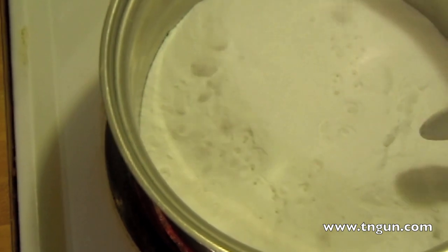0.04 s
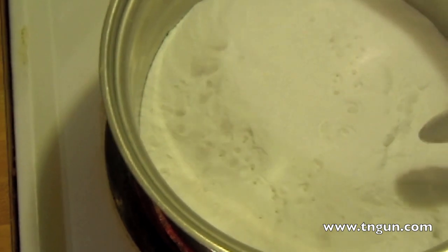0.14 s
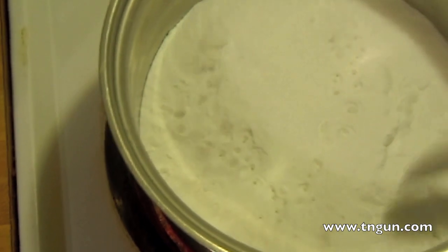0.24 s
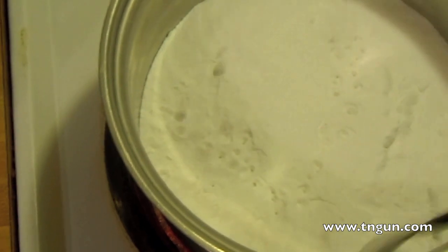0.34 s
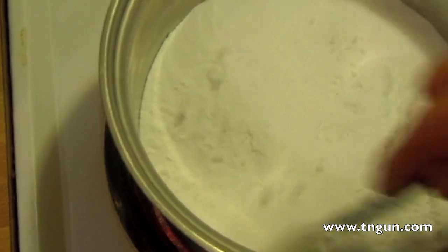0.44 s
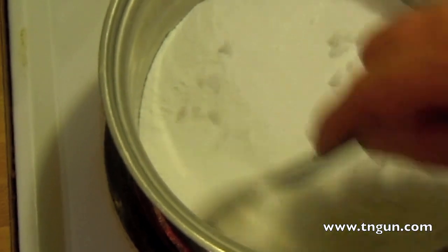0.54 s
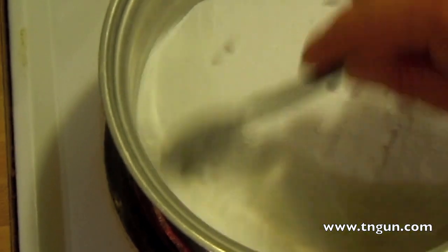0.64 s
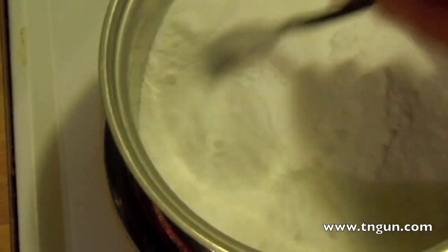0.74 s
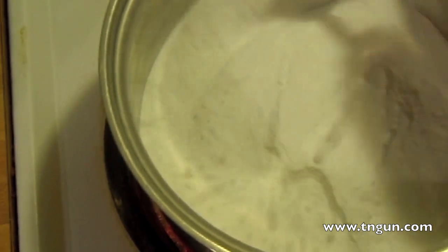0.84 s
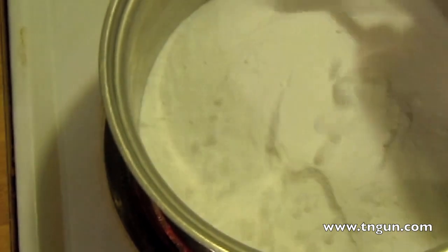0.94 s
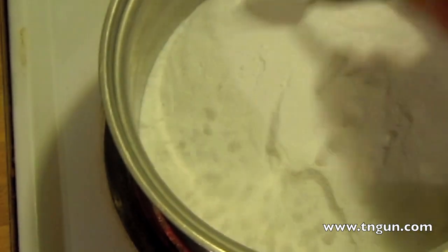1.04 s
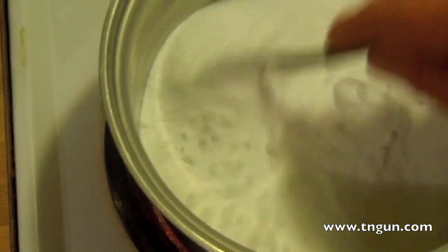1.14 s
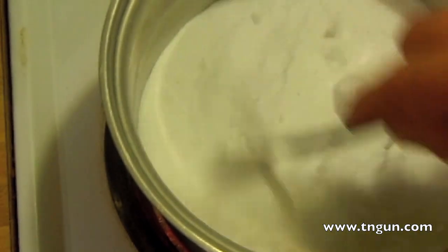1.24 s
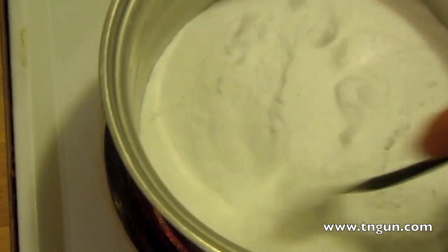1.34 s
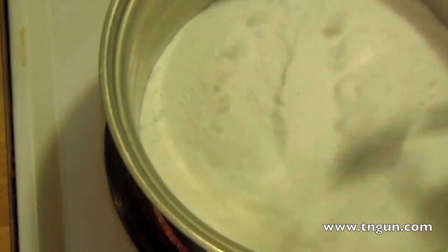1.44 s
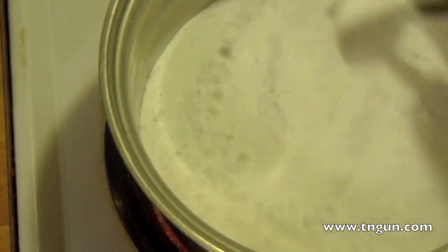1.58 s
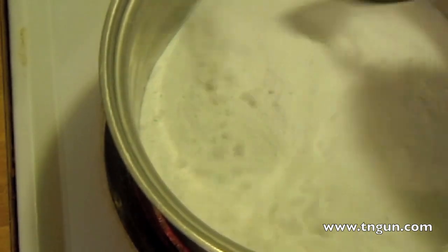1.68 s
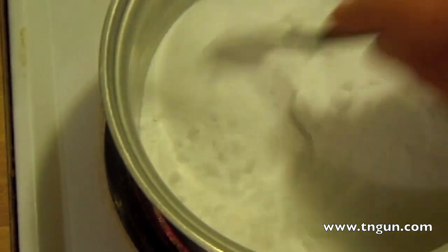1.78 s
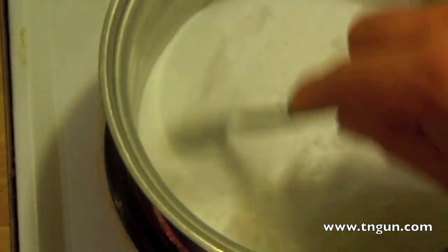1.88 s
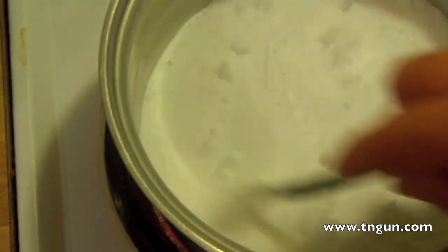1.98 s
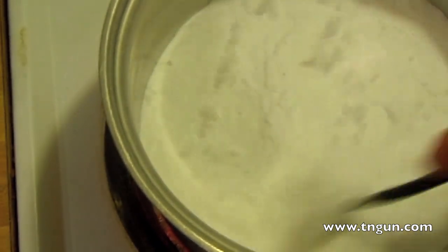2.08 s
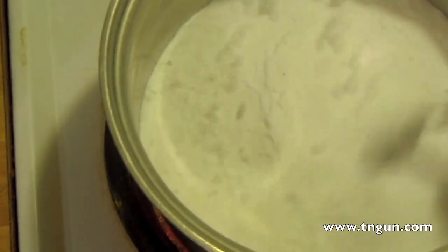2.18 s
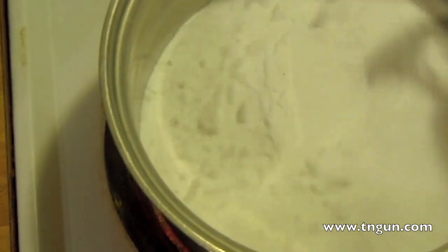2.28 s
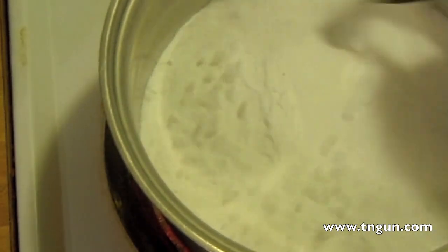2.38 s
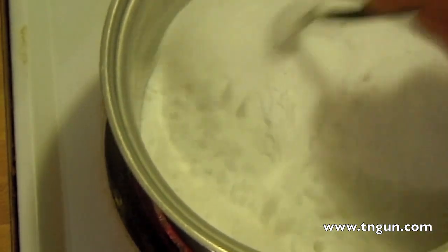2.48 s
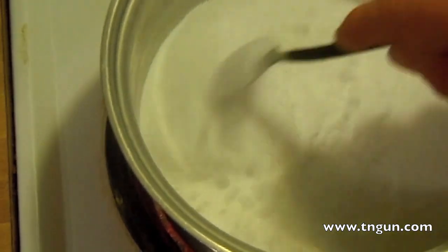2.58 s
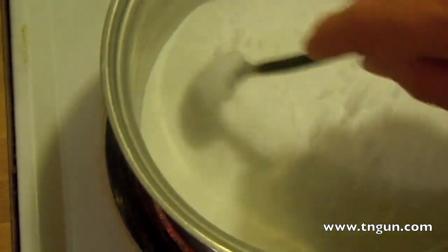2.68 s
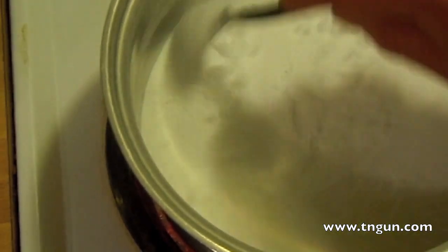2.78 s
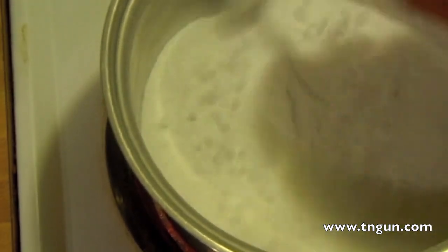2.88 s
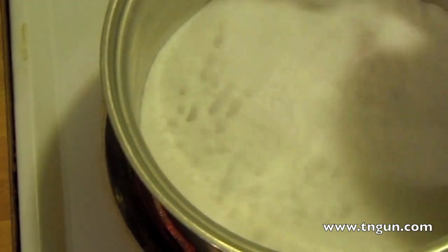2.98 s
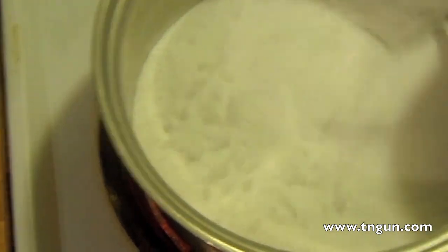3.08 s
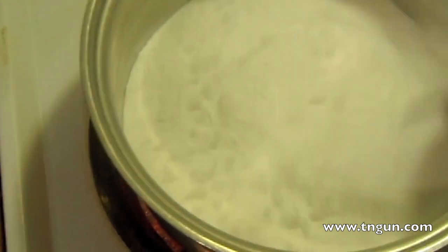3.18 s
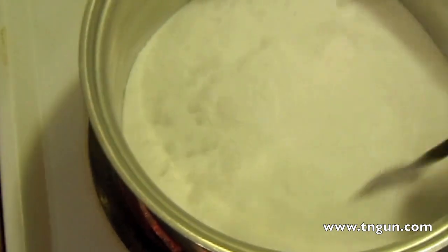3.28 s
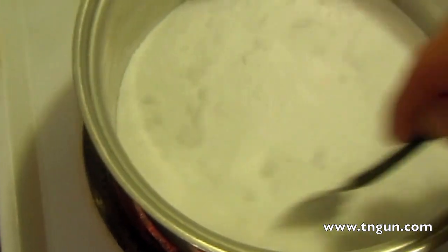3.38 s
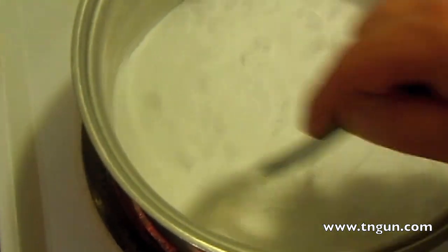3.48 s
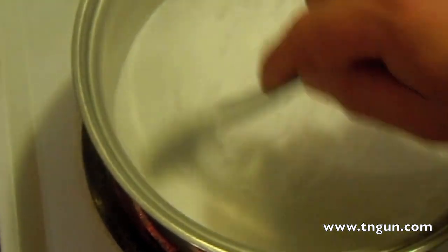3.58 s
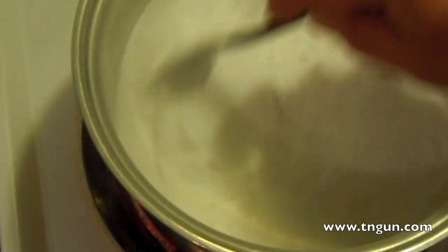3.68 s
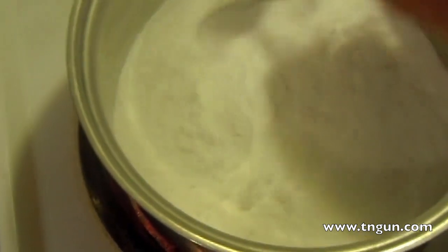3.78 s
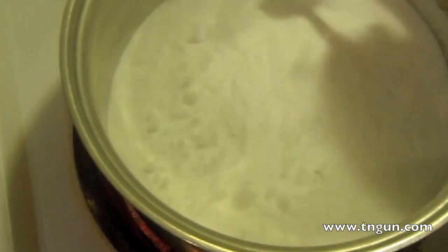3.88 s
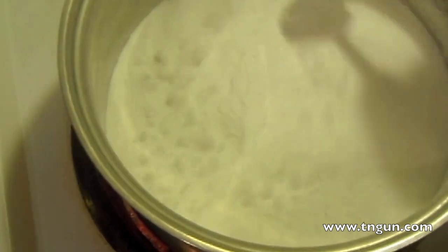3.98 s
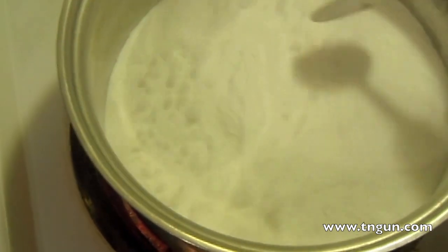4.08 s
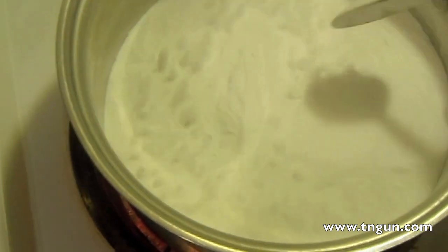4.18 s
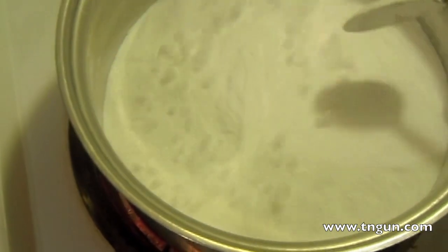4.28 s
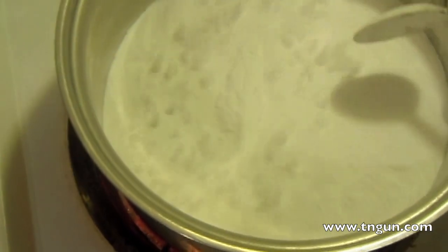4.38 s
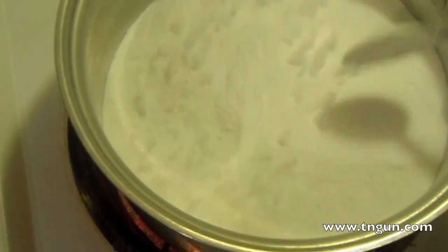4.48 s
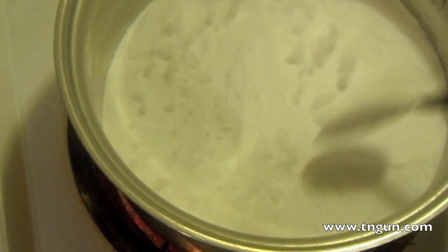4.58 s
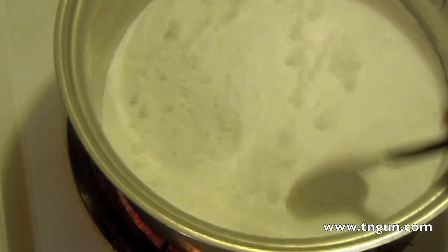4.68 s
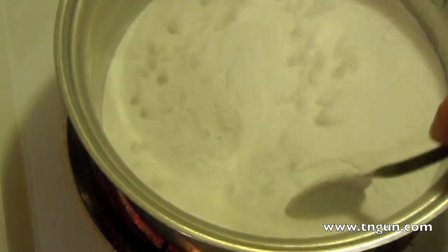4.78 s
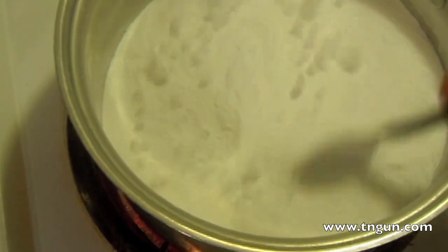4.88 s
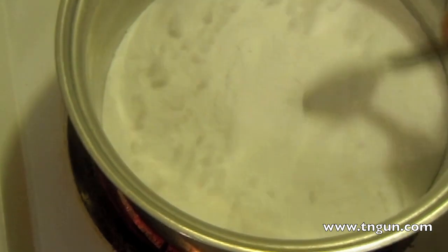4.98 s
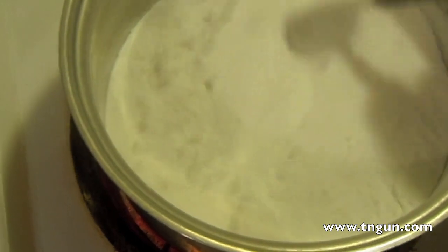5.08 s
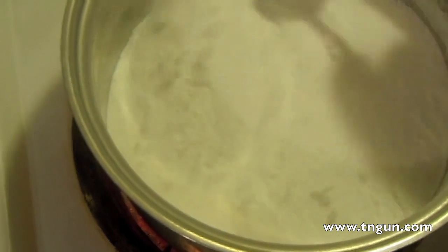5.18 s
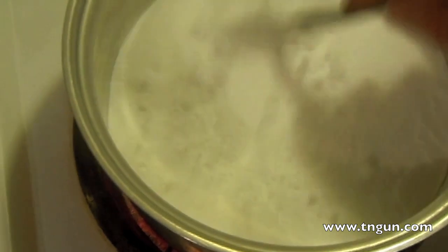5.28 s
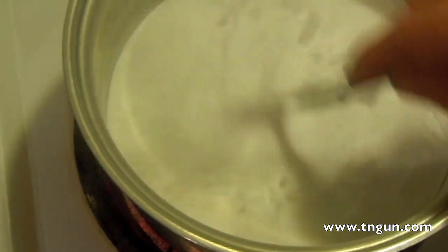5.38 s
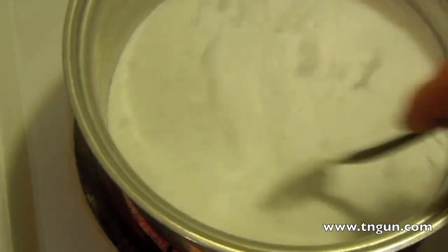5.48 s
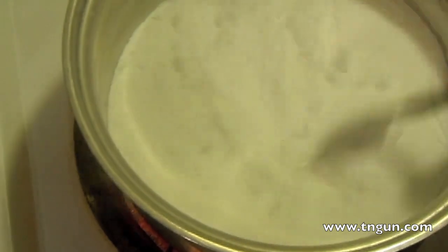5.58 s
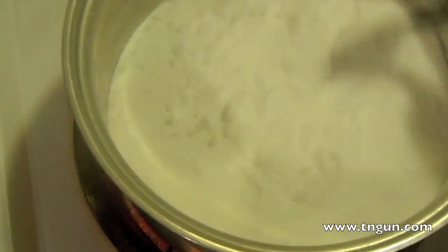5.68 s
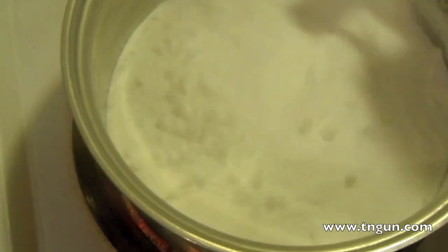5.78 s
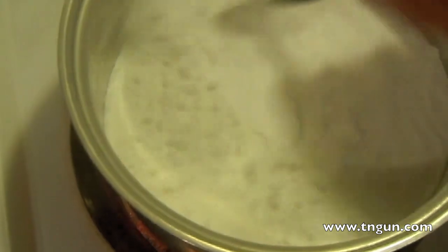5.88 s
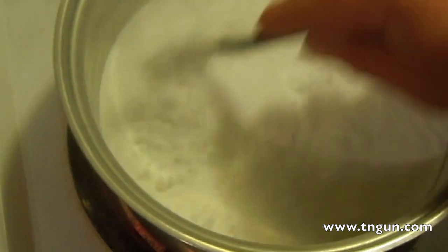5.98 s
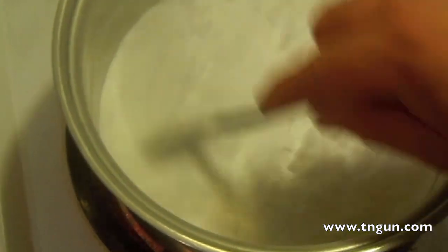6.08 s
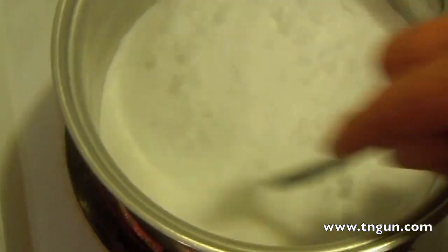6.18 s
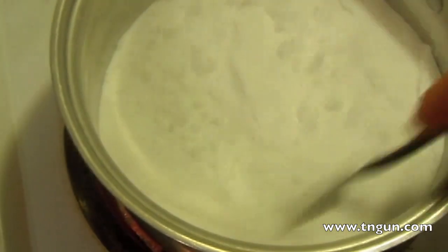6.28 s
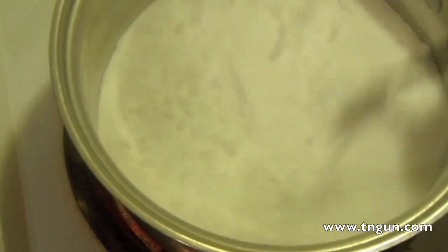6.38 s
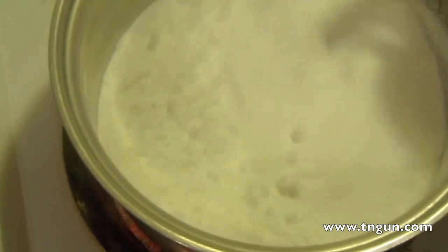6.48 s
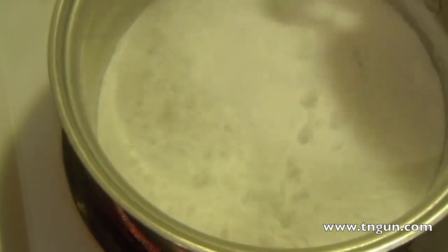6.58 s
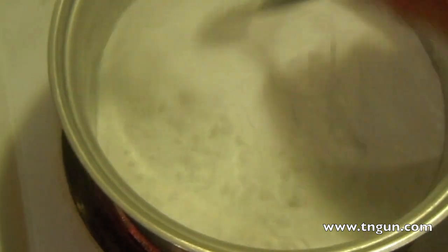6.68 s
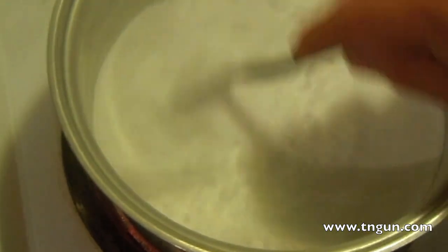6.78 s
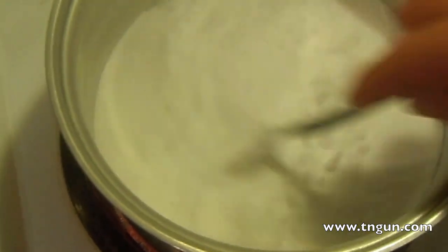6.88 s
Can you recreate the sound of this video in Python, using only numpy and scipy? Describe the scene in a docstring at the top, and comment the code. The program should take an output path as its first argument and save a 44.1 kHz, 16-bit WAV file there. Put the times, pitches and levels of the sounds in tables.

```python
"""In a kitchen, a metal spoon stirs hot gritty powder in a steel saucepan, close to a pair of microphones.
Crushed grit and short jolts of the spoon shake the pan: it rings at its own pitches (modes), with a
dense wash of noise bands between them. Clean knocks add thuds, and the sticking, slipping spoon sings.
Behind: dull reflections, and a background of kitchen rumble, microphone hiss and a thin high whine on
the right, whose level dips near 2.4 s, creeps back, and dips again near the end."""
import sys
import numpy as np
from scipy import signal
from scipy.io import wavfile

SR = 44100
rng = np.random.default_rng(int(sys.argv[2]) if len(sys.argv) > 2 else 0)


def log_audio(samples):
    """Write samples as a 16-bit WAV file to the path given in sys.argv[1]."""
    # one column per channel
    frames = np.atleast_2d(samples).T
    # limit to full scale, then quantise
    limited = np.clip(frames, -1, 1)
    pcm = np.round(limited * 32767).astype(np.int16)
    wavfile.write(sys.argv[1], SR, pcm)


N = 306054  # length in samples
STEP = 16  # samples per control step: slow changes are worked out only this often

# centres of the pan's six regions: rocking, base, wall, spoon, grit, fizz (f/Hz)
REGION_CENTRES = [300, 900, 2300, 5000, 8400, 11300]
# strokes of the spoon through the powder:
# (strongest at t/s, rise t/ms, fall t/ms, pressure level/dB, base shaking level/dB, brightness level/dB)
SPOON_STROKES = [(.225, 81, 160, -40, -52, 5), (0.283, 92, 45, -31.5, -49, 15.5),
                 (.436, 17, 55, -30, -27.5, -0.5), (.468, 80, 22, -39.5, -50, -1),
                 (.538, 24, 96, -34, -32.5, -2.5), (.6, 214, 150, -40, -37, -0.5),
                 (.71, 260, 310, -40, -49, 3.5), (1.02, 30, 84, -34, -27.5, -3),
                 (1.138, 49, 99, -40, -33, -6.5), (1.25, 96, 77, -35.5, -42.5, 0.5),
                 (1.33, 350, 260, -41.5, -49, 3.5), (1.449, 110, 57, -33.5, -38, -1.5),
                 (1.65, 200, 160, -62, -68, 3), (1.78, 24.6, 51, -25, -29, -4),
                 (1.848, 28, 65, -19, -36, -2), (1.98, 430, 880, -42, -49, 4.5),
                 (2.131, 45, 80, -27.5, -40.5, -4), (2.379, 10.7, 26, -11, -28, -3.5),
                 (2.45, 39, 25, -35, -38, -8.5), (2.48, 71, 73, -50.5, -50.5, -5.5),
                 (2.825, 14, 143, -34, -42.5, 10), (2.95, 12, 150, -42, -63, 7),
                 (3.028, 102, 163, -31.5, -45.5, 4), (3.1, 130, 56, -32.5, -60, 12.5),
                 (3.286, 29, 60, -25.5, -48, -1.5), (3.309, 41, 79, -23, -27.5, -1.5),
                 (3.44, 290, 210, -55, -51, 1), (3.61, 73, 180, -32.5, -42, 1),
                 (3.72, 150, 750, -56, -63, 2), (3.85, 310, 39, -48, -61, 4.5),
                 (4.77, 17.6, 70, -45.5, -34.5, 6), (4.905, 74, 108, -27.5, -38, 2),
                 (5.1, 270, 580, -57.5, -59, 5.5), (5.399, 14, 60, -45, -45, 3),
                 (5.51, 39, 120, -49, -50, 6), (5.59, 115, 108, -36.5, -44.5, -0.5),
                 (5.78, 28, 23, -25.5, -31, 0), (5.838, 64, 62, -25.5, -28.5, -6),
                 (5.884, 20, 43, -28, -42, -5.5), (5.929, 54, 106, -25.5, -32.5, -8.5),
                 (6.001, 22, 31, -6.5, -26, 0.5), (6.07, 170, 480, -40.5, -49, 4.5),
                 (6.26, 20, 175, -36, -50, -7), (6.33, 167, 100, -32.5, -45.5, -2.5),
                 (6.39, 110, 150, -40.5, -53, 8.5), (6.56, 19, 45, -42.5, -47, 2.5),
                 (6.6, 50, 24, -40, -38, 3), (6.68, 28, 68, -51, -39.5, 7), (6.768, 69, 66, -23, -32.5, -6),
                 (6.88, 450, 360, -39.5, -42.5, 4.5)]
# jolts of the spoon on steel:
# (start t/s, peak level/dB, hardest-shaken region from 1 base to 4 grit, rocking level/dB, fall t/ms)
SPOON_JOLTS = [(0.415, -24, 3.3, -33, 7.1), (0.431, -24, 1.0, -18.5, 7.9), (0.529, -19.5, 2.48, -16.5, 8.8),
               (0.613, -25, 0.97, -28, 5.2), (0.647, -37, 2, -28.5, 13), (0.986, -21.5, 2.44, -60, 13),
               (1.021, -18, 2.42, -56, 26), (1.774, -38, 2.1, -50, 6.0), (1.839, -10, 3.13, -35, 4),
               (2.371, -8.5, 1.88, -33, 3.6), (2.437, -23, 2.0, -48, 5.5), (2.818, -23, 4.5, -27, 25),
               (2.938, -24, 4.0, -32.5, 54), (3.033, -18, 4.1, -32, 6.2), (3.267, -24, 1.4, -60, 5.4),
               (3.549, -19, 1.71, -17, 6.3), (3.653, -17.5, 2.5, -29, 7.1), (4.765, -33.5, 1.3, -22.5, 26),
               (4.842, -23.5, 2.38, -36, 20), (5.396, -27.5, 3.5, -55, 17), (5.772, -17.5, 2.0, -40, 8.4),
               (5.921, -20, 3, -55, 12), (5.993, -25, 2.3, -24, 24), (6.249, -22.5, 2.2, -57, 6.5),
               (6.587, -25, 1.4, -63, 5.4), (6.717, -12, 2.6, -45, 11)]
# clean knocks of the spoon through the powder:
# (start t/s, blow level/dB, contact cut-off f/Hz, thud f/Hz, thud level/dB before its left-right tilt)
SPOON_KNOCKS = [(0.4187, -13, 900, 590, -28), (.4317, -1, 1300, 830, -12), (0.531, -20, 1500, 810, -12.5),
                (0.6107, -21, 1300, 800, -17.5), (0.646, -25, 900, 556, -26),
                (2.3737, 0.5, 4970, 390, -18.5), (2.3786, 3, 4950, 990, -31),
                (2.8198, -15, 9000, 7800, -15), (3.548, -14, 1890, 610, -23.5),
                (4.7663, -24, 1170, 626, -22.5), (5.774, 10, 2530, 399, -29.5),
                (6.715, -18, 5000, 800, -30)]
# moments when stick and slip lock to one mode: (start t/s, length t/ms, nearest mode f/Hz, level/dB)
SINGING_MOMENTS = [(.19, 150, 7420, -39.5), (.21, 51, 2580, -51), (.32, 28, 2580, -46.5),
                   (.535, 19, 355, -34), (.432, 27, 812, -32.5), (5.8, 23, 390, -34),
                   (2.11, 33, 1390, -35.5), (4.84, 110, 1710, -47.5), (4.84, 41, 705, -48),
                   (5.5, 44, 2158, -39.5), (6.0, 20, 4615, -20), (1.13, 41, 2158, -37.5),
                   (.435, 43, 355, -33.5), (.545, 69, 705, -36), (0.979, 7.6, 812, -18),
                   (.985, 9.9, 1710, -30.5), (1.015, 9.4, 2850, -18.5), (1.06, 27, 2850, -46),
                   (1.01, 25, 812, -32.5), (1.11, 50, 812, -33), (1.3, 52, 2158, -45.5),
                   (5.39, 16, 978, -39.5), (3.65, 17, 1230, -35.5), (1.42, 15, 2580, -31),
                   (1.767, 32, 2158, -20), (1.811, 34, 812, -31), (2.119, 12, 2580, -24),
                   (2.373, 13, 2158, -5.5), (2.39, 160, 2158, -49), (5.77, 25, 2158, -28.5),
                   (6.02, 120, 2580, -45), (2.373, 11, 978, -15.5), (2.375, 13.5, 3195, -19),
                   (2.44, 14, 1390, -29.5), (2.816, 37, 705, -27), (3.02, 92, 7420, -36),
                   (3.075, 70, 2580, -41.5), (3.263, 5.4, 978, -18), (3.274, 25, 812, -28.5),
                   (3.29, 54, 1710, -35), (3.29, 30, 3195, -28), (5.761, 26, 390, -28.5),
                   (5.83, 60, 2158, -32), (5.84, 190, 812, -41), (5.91, 42, 2158, -21.5),
                   (5.99, 11, 4420, -10), (6.583, 13.6, 1230, -28), (6.71, 37, 2158, -31),
                   (6.739, 100, 812, -37.5)]
# modes of pan and spoon: (f/Hz, width f/Hz before the powder's damping, top level/dB)
PAN_MODES = [(151, 17, 10.5), (355, 22, 10), (390, 85, 8), (705, 5.5, 19.5), (641, 30, 18.5),
             (812, 29, 17.5), (978, 11, 15), (1230, 90, 2.5), (1390, 5.8, 2.5), (1710, 190, 7),
             (2158, 33, 16.5), (2256, 14, 15), (2580, 17, 14.5), (2850, 14, 11), (3085, 27, 5.5),
             (3195, 19, 10), (3676, 13, 8), (3947, 11, -7.5), (4420, 17.7, 14.5), (4615, 19, 13),
             (4827, 10, 7.5), (4920, 6.3, 7), (5430, 10, 11.5), (6047, 38, 17.5), (6190, 7.7, 12),
             (6470, 8, 12), (6990, 39, 5.5), (7420, 31, 16.5), (7950, 127, 17), (8450, 46, 10),
             (5010, 6.9, 4.5), (6660, 18, 7.5), (8215, 15, 20), (8640, 14, -6.5)]
# the wash of crowded modes: (f/Hz, level/dB)
WASH_SPECTRUM = [(110, 4), (300, 6), (550, 11.5), (1000, 14), (1500, 7), (2400, 6.5), (3500, 4.5),
                 (5500, 4.5), (7600, 7), (9300, 4), (11300, 14), (12400, -5)]
# how alike the pan is on left and right: (f/Hz, likeness where 1 is the same)
PAN_SIDE_LIKENESS = [(100, 0.78), (700, 1), (2900, 0.97), (6300, 0.65), (13700, 0.41)]
# how the pan leans to one side: (f/Hz, left minus right level/dB)
PAN_SIDE_BALANCE = [(100, -1.5), (250, -4), (2200, -3.5), (4500, -6), (8000, 0), (13700, 8)]
# spectrum of the room tone before its overall level is set: (f/Hz, level/dB per Hz)
ROOM_TONE_SPECTRUM = [(12, -30), (20, -4), (65, -2.5), (240, -8.5), (330, -10), (530, -15), (1000, -23),
                      (1300, -24), (2200, -27), (3100, -26), (4000, -31), (8000, -32.5), (12300, -35.5),
                      (13300, -48.5), (16000, -53.5)]
# how alike the room tone is on left and right: (f/Hz, likeness where 1 is the same)
ROOM_SIDE_LIKENESS = [(60, 0.95), (180, 0.9), (530, 0.7), (1560, 0.21), (4620, -0.088), (13700, -0.011)]
# level of room tone and whine over time: (t/s, level/dB)
BACKGROUND_LEVEL = [(0, 0), (2.37, 0), (2.39, -4), (3.15, -4.5), (3.35, -3), (3.9, -1), (4.9, -1.2),
                    (5.5, 0), (6.3, -2.6), (6.94, -2.6)]

# a stroke loses SWELL_DB over its rise or fall time; the curve sets how round its top is
SWELL_DB, SWELL_CURVE = 26, 1.19
MEAN_PRESSURE_DB = -35
# at mean pressure: (level/dB, share of a pressure change that it follows, share of the brightness)
WALL_LAW, SPOON_LAW = (-35.5, 0.81, -1.09), (-34, 1.0, 0.0)
GRIT_LAW, FIZZ_LAW = (-42, 0.86, 1), (-53, 0.7, 0.44)
BASE_FOLLOWS = 0.73  # share of the swell that the base follows
ROCKING_DB = -8  # rocking in a stroke, next to the base
RESTING_DB = -64  # small drive always added under the strokes
LIFT_DB = -55.5  # below this drive the spoon is leaving the pan and the rubbing dies faster
JOLT_RISE_MS = 0.51
JOLT_LOSS_DB = 17  # loss for each region away from the hardest-shaken one
GRIT_PER_S, GRIT_SPREAD_DB = 5000, 1.5  # chance of a grain before clumping; unevenness of sizes
POWDER_DAMPING = .005  # share of a mode's pitch that the powder bed adds to its width
THUD_CYCLES = 17.7  # a thud fades by 60 dB in this many cycles
KITCHEN_T60_S, KITCHEN_DB = 0.27, -18  # time for reflections to fade by 60 dB; their level
ROOM_TONE_DB, WHINE_DB = -43, -43  # before the background level curve
WHINE_HZ = 12857.0
CUTOFF_HZ = 14200  # the finished sound is cut above this


def saucepan():
    """Grains and blows drive every mode and noise band; the contact point wanders, so each swells alone."""
    drive_db, grains = shaking(), grit()
    blows, thuds = knocks()
    # where the wall is driven less than the grit, a light touch hisses but hardly rings the steel
    brushing_db = 0.79 * np.minimum(drive_db[2] - drive_db[4], 0)

    def excite(hz, level_db, wander_db, blow_db):
        """Force at one pitch, read between the two nearest regions."""
        place = np.interp(np.log(hz), np.log(REGION_CENTRES), np.arange(len(REGION_CENTRES)))
        k = min(int(place), len(REGION_CENTRES) - 2)
        region_db = drive_db[k] + (place - k) * (drive_db[k + 1] - drive_db[k])
        rubbing = every_sample(amp(region_db + wander_db)) * grains
        blow = amp(blow_db) * blows * [[1], [0]]  # only in the shared signal
        return amp(level_db) * (rubbing + blow)

    rings = 0
    for hz, width_hz, top_db in PAN_MODES:
        r = np.exp(-np.pi * (width_hz + POWDER_DAMPING * hz) / SR)
        force = excite(hz, top_db, brushing_db + 3.5 * drift(9), 0)
        force = force + singing(hz) * [[1], [0]]
        # a resonator with gain of about 1 at its peak
        numerator = [(1 - r * r) / 2, 0, (r * r - 1) / 2]
        denominator = [1, -2 * r * np.cos(2 * np.pi * hz / SR), r * r]
        ring = signal.lfilter(numerator, denominator, force)
        rings = rings + spread(ring, at_hz(PAN_SIDE_LIKENESS, hz), at_hz(PAN_SIDE_BALANCE, hz))

    # keep the modes' ringing below about 9.5 kHz; the wash fills in above
    out = signal.sosfilt(signal.butter(6, 9500, fs=SR, output="sos"), rings)
    out = out + thuds * amp([[-2], [2]])  # thuds lean to the right
    for hz, sos in bands(order=3)[7:-1]:  # about 100 Hz to 13 kHz
        patchy_db = 2.5 * drift(20)
        wash = signal.sosfilt(sos, excite(hz, at_hz(WASH_SPECTRUM, hz), patchy_db, -56.0))
        out = out + spread(wash, at_hz(PAN_SIDE_LIKENESS, hz), at_hz(PAN_SIDE_BALANCE, hz))
    return signal.sosfilt(signal.butter(8, 12200, fs=SR, output="sos"), out)


def shaking():
    """How hard each region is driven, in dB per control step: strokes plus jolts, summed as power."""
    t = np.arange(N // STEP + 1) * STEP / SR
    power = np.full((len(REGION_CENTRES), len(t)), amp(RESTING_DB) ** 2)
    for at, rise_ms, fall_ms, pressure_db, base_db, bright_db in SPOON_STROKES:
        side_ms = np.where(t < at, rise_ms, fall_ms)
        swell_db = -SWELL_DB * (np.abs(t - at) * 1000 / side_ms) ** SWELL_CURVE
        base = base_db + BASE_FOLLOWS * swell_db
        pressure_change = pressure_db + swell_db - MEAN_PRESSURE_DB
        upper = [db + follows * pressure_change + share * bright_db
                 for db, follows, share in (WALL_LAW, SPOON_LAW, GRIT_LAW, FIZZ_LAW)]
        power += amp([base + ROCKING_DB, base] + upper) ** 2

    rubbing_db = 10 * np.log10(power)
    power = amp(rubbing_db + np.minimum(rubbing_db - LIFT_DB, 0)) ** 2

    for at, peak_db, hardest, rocking_db, fall_ms in SPOON_JOLTS:
        ms = np.maximum(t - at, 0) * 1000
        shape = (1 - np.exp(-ms / JOLT_RISE_MS)) * np.exp(-ms / max(fall_ms, .5))
        distance = np.abs(np.arange(1, len(REGION_CENTRES) - 1) - hardest)
        region_db = list(peak_db - JOLT_LOSS_DB * distance)
        fizz_db = region_db[-1] - 25  # a jolt throws little fizz
        gains = amp([rocking_db] + region_db + [fizz_db])[:, None]
        power += (gains * shape / shape.max()) ** 2
    return 10 * np.log10(power)


def grit():
    """Grains crushed at random, uneven in size and in clumps; a second set of signs is for other paths."""
    clumping = every_sample(amp(3.0 * drift(40)))
    born = rng.random(N) < GRIT_PER_S / SR * clumping
    sizes = born * amp(GRIT_SPREAD_DB * np.minimum(rng.exponential(1, N), 5))
    return sizes / sizes.std() * rng.choice([-1, 1], (2, N))


def knocks():
    """One push each, softened by powder under the spoon, and the dull thud of the packed bed."""
    pushes, thuds = np.zeros(N), np.zeros(N)
    t = np.arange(2000) / SR
    for at, blow_db, cut_hz, thud_hz, thud_db in SPOON_KNOCKS:
        start = round(at * SR)
        push = t * np.exp(-2 * np.pi * cut_hz * t)
        pushes[start:][:2000] += amp(blow_db) * push / push.sum()
        fading = amp(thud_db - 60 * t * thud_hz / THUD_CYCLES)
        thuds[start:][:2000] += fading * np.sin(2 * np.pi * thud_hz * t)
    return pushes, thuds


def singing(hz):
    """Force at a mode's own pitch while the slips lock to it; looser and rougher on high modes."""
    t, force = np.arange(N) / SR, np.zeros(N)
    pitches = np.array(PAN_MODES)[:, 0]
    for at, length_ms, near_hz, db in SINGING_MOMENTS:
        if pitches[np.abs(pitches - near_hz).argmin()] == hz:
            held = force[round(at * SR):round((at + length_ms / 1000) * SR)]
            # the lock sets in and lets go gradually; adding to this slice fills in force
            held += np.sqrt(2) * amp(db) * signal.windows.tukey(len(held), .4)
    loose = hz / 2500
    uneven, slip = every_sample(drift(24)), every_sample(drift(24))
    tone = np.sin(2 * np.pi * hz * t + .7 * loose * slip)
    return force * amp(2.5 * loose * uneven) * tone


def kitchen(x):
    """Dull reflections that start after 6 ms and die away, other ones on each side."""
    t = np.arange(int(.4 * SR)) / SR
    dull_noise = signal.lfilter([.4], [1, -.6], rng.standard_normal((2, len(t))))
    tail = dull_noise * amp(-60 * t / KITCHEN_T60_S) * (t > .006)
    tail /= np.sqrt((tail ** 2).sum(axis=1, keepdims=True))
    return amp(KITCHEN_DB) * signal.fftconvolve(x, tail, axes=1)[:, :N]


def room_tone():
    """Noise in bands: rumble alike on both sides, hiss unrelated; each band flickers a little."""
    white, out = rng.standard_normal((2, 2, N)), 0
    for k, (hz, sos) in enumerate(bands(order=2)):
        gain = every_sample(amp(at_hz(ROOM_TONE_SPECTRUM, hz) + 1.0 * drift(21)))
        noise = signal.sosfilt(sos, white[k % 2])  # neighbouring bands use different noise
        out = out + gain * spread(noise, at_hz(ROOM_SIDE_LIKENESS, hz), -0.55)
    return amp(ROOM_TONE_DB) * out / out.mean(axis=0).std()


def whine():
    """A thin sine tone of fixed pitch, almost only on the right."""
    phase = 2 * np.pi * WHINE_HZ * np.arange(N) / SR
    left, right = amp(-24) * np.sin(phase - 2.4), np.sin(phase)
    return np.sqrt(2) * amp(WHINE_DB) * np.array([left, right])


def amp(db):
    """Turn dB into a gain."""
    return 10 ** (np.asarray(db) / 20)


def at_hz(points, hz):
    """Read a curve at one frequency, on a log-frequency axis."""
    points = np.array(points)
    return np.interp(np.log(hz), np.log(points[:, 0]), points[:, 1])


def every_sample(steps):
    """Hold each control step to give one value per sample."""
    return np.repeat(steps, STEP)[:N]


def drift(rate):
    """Slow random wandering with a spread of 1, one value per control step; rate in Hz."""
    r = np.exp(-2 * np.pi * rate * STEP / SR)
    noise = rng.standard_normal(N // STEP + 3001)
    slow = signal.lfilter([1], [1, -2 * r, r * r], noise)[3000:]  # drop the filter's start-up
    return slow / slow.std()


def spread(pair, alike, balance_db):
    """Make left and right from a shared signal and one that is opposed on the two sides."""
    alike = np.clip(alike, -1, 1)
    sides = np.sqrt(1 + alike) * pair[0] + np.sqrt(1 - alike) * pair[1] * [[1], [-1]]
    balance = amp([[balance_db / 2], [-balance_db / 2]])
    return sides * balance / np.sqrt(1 + alike + 1e-9)


def bands(order):
    """Third-octave band-pass filters, each with its centre in Hz."""
    edges = 20 * 2 ** np.arange(0, 9.7, 1 / 3)
    return [(np.sqrt(low * high), signal.butter(order, [low, high], "band", fs=SR, output="sos"))
            for low, high in zip(edges, edges[1:])]


def scene():
    """Pan with its reflections over the background."""
    pan = saucepan()
    seconds, level_db = np.transpose(BACKGROUND_LEVEL)
    background_gain = amp(np.interp(np.arange(N) / SR, seconds, level_db))
    return pan + kitchen(pan) + background_gain * (room_tone() + whine())


def record(dry):
    """Peaks are rounded, then the top is cut steeply."""
    steep = signal.ellip(10, .5, 70, CUTOFF_HZ, fs=SR, output="sos")
    rounded = 1.134 * np.tanh(dry / 1.882)
    return signal.sosfilt(steep, rounded)


dry = scene()
out = record(dry)
log_audio(out)
```